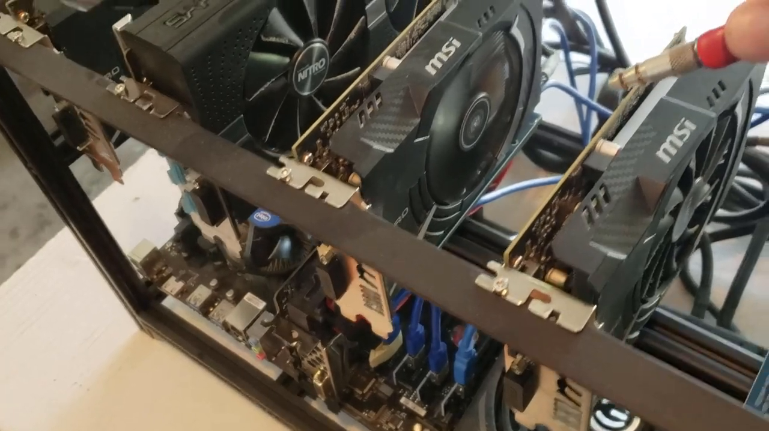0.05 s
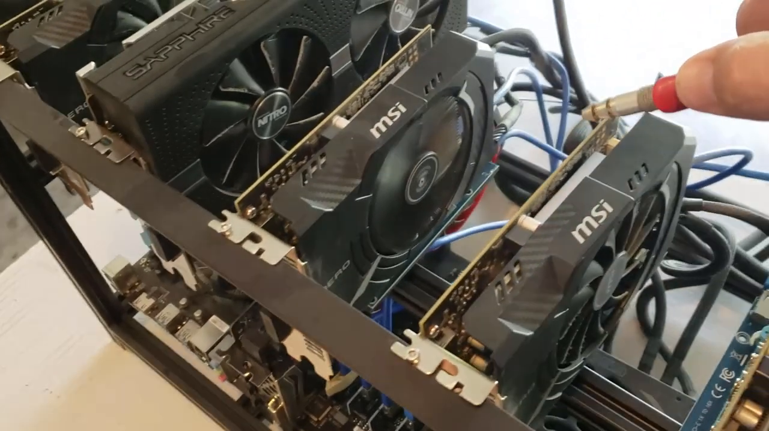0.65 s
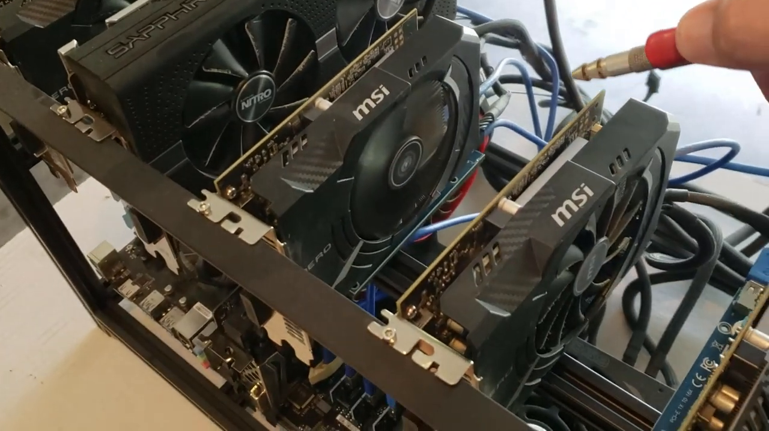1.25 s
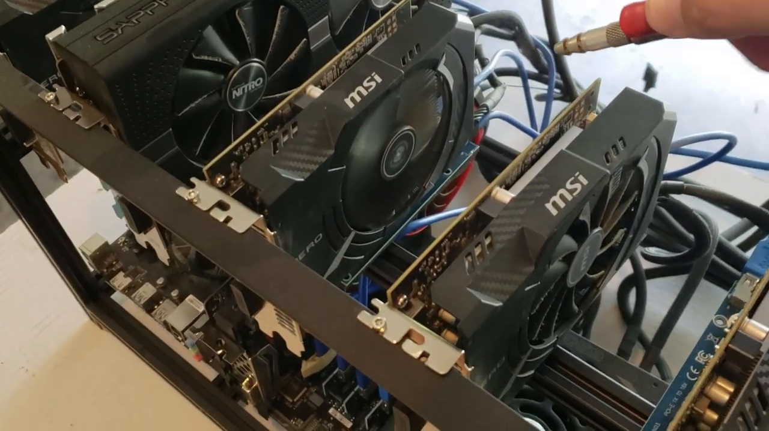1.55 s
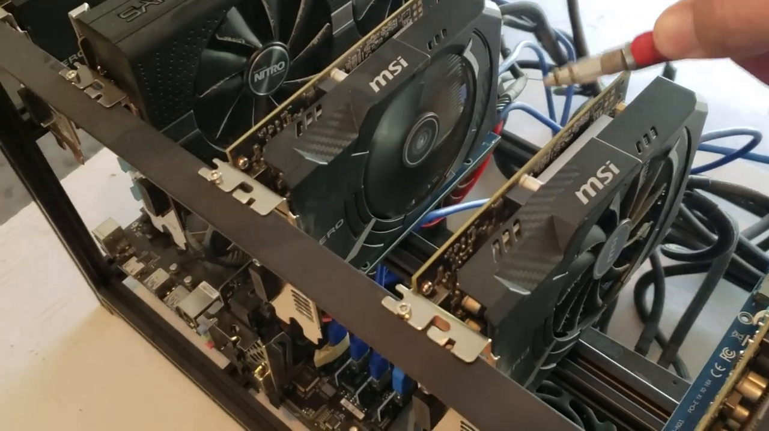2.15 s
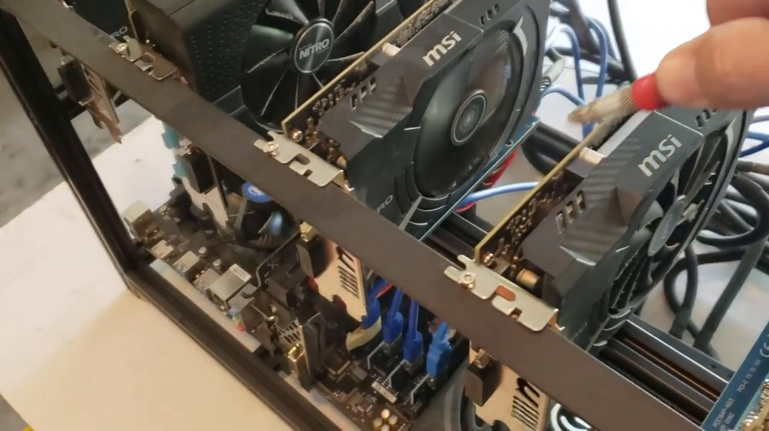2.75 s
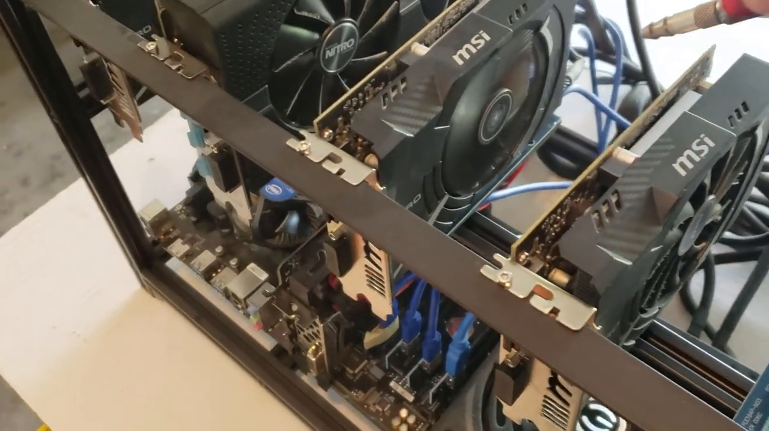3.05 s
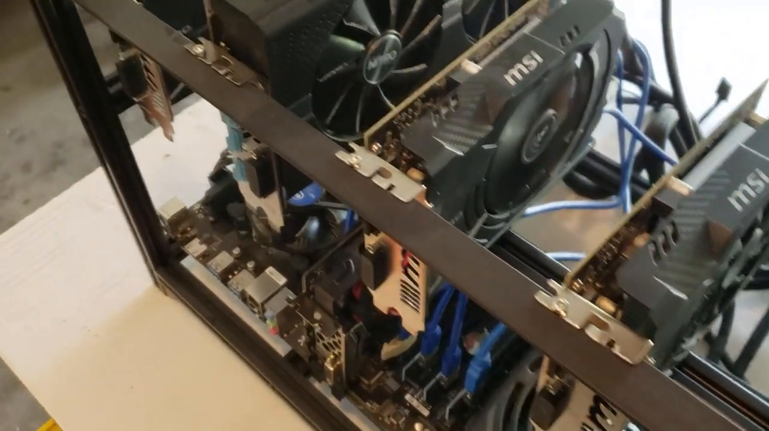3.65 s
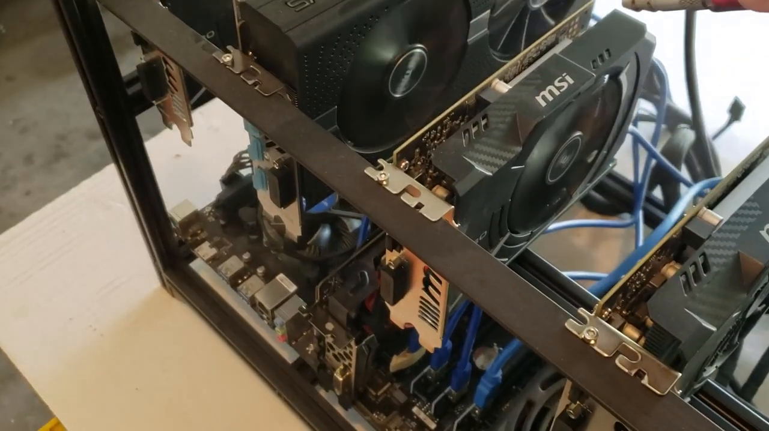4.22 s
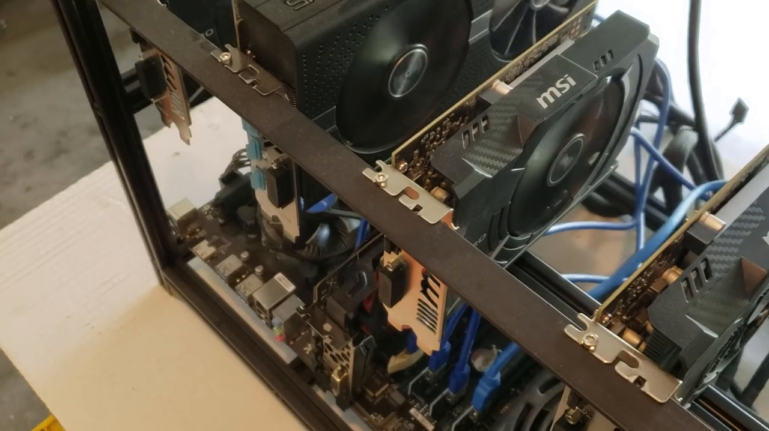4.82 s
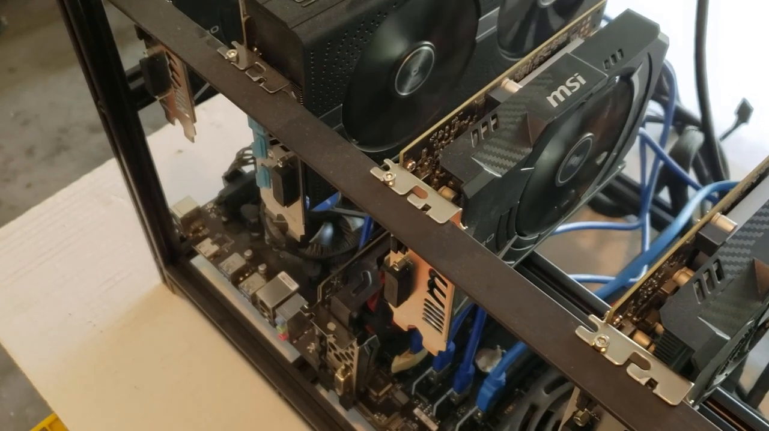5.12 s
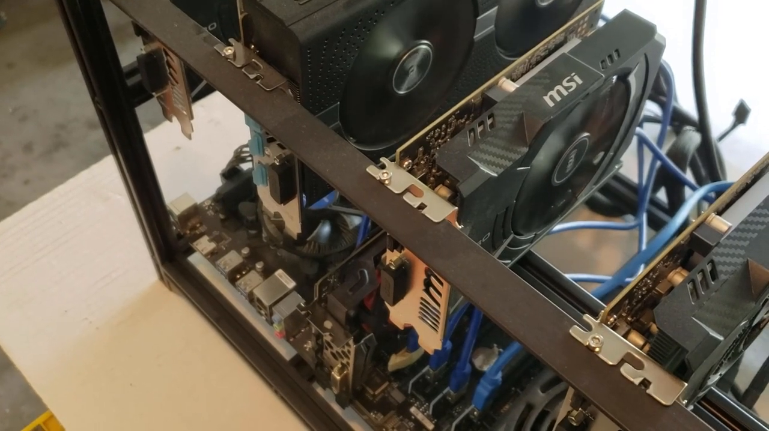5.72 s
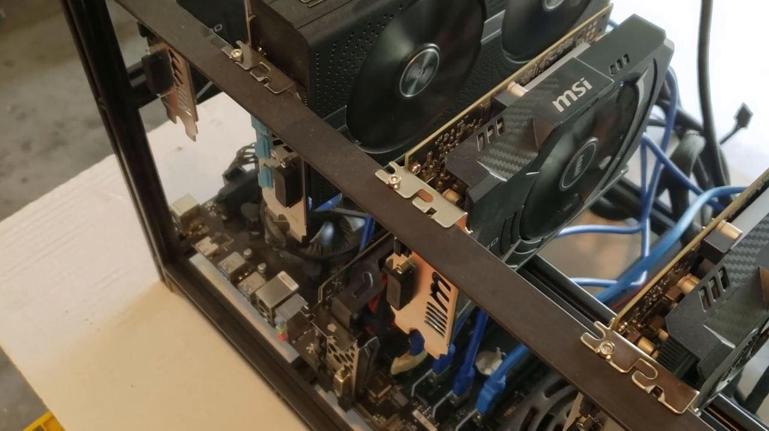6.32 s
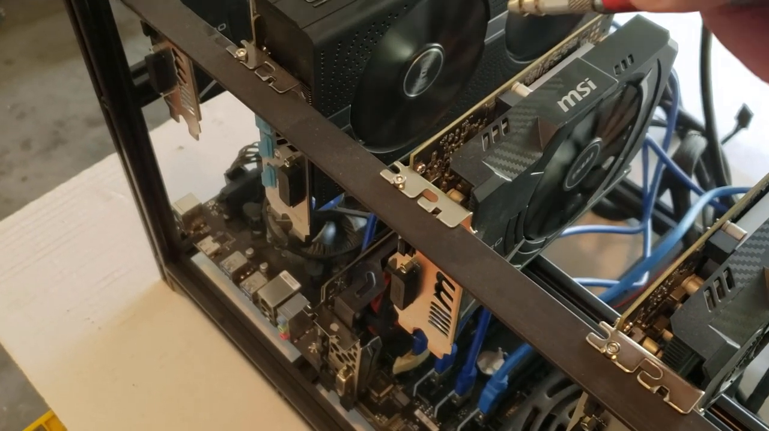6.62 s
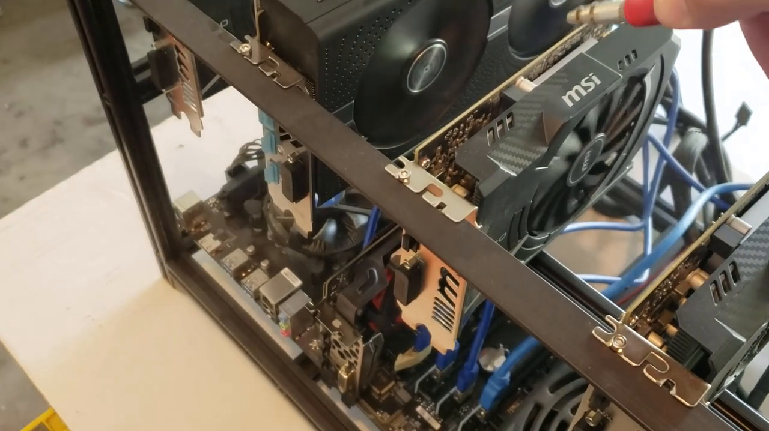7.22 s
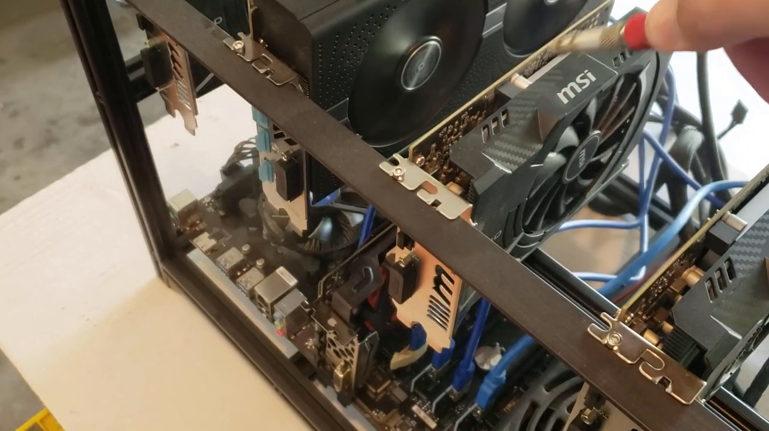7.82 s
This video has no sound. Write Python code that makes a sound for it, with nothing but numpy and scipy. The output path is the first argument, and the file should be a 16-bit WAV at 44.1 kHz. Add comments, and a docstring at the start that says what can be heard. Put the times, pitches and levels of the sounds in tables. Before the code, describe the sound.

Sharp, mostly short blasts of compressed air hiss over computer heatsinks and fans, close by in a small room.

```python
"""A small hard room, a stereo pair of microphones close to an open computer frame.
A blow gun, a little to the left, dusts the frame with eleven bursts of compressed air. The jet hisses,
rushes over heatsink fins and sounds the hollows between the cards, each aim with its own resonances.
Puffs of air buffet the microphones, now and then the jet spins up a fan, and once the gun knocks lightly.
Between the bursts a faint leak hisses over the room's low rumble."""
import sys
import numpy as np
from scipy import signal
from scipy.fft import rfft, irfft, next_fast_len
from scipy.io import wavfile
from scipy.ndimage import map_coordinates

SR = 44100
rng = np.random.default_rng(int(sys.argv[2]) if len(sys.argv) > 2 else 0)


def store_wav(level_fs):
    """Save 16-bit WAV to argv[1]."""
    pcm = np.round(np.clip(np.atleast_2d(level_fs), -1, 1) * 32767)
    wavfile.write(sys.argv[1], SR, pcm.T.astype(np.int16))


N = 347066
TIME = np.arange(N) / SR
SIDES = np.array([[1], [-1]])   # left, right
CUTOFF_HZ = 15750
# the hollow of the frame lifts the air and the fans' hum near one pitch
FRAME_HZ, FRAME_WIDTH_HZ, FRAME_BOOST_DB = 319, 13, 5.5
# trigger pulls: valve opens/s, is shut/s, closing time/s, puff/dB, lean to the left/dB,
# base levels of hollows/dB, fins/dB and free jet/dB, change on the fins as the hand moves/dB
BURSTS = [(.734, 1.026, 0.021, -57, 2, -32.5, -28.5, -25, 1.5),
          (1.645, 1.901, 0.023, -53, 1.5, -30, -23.5, -25.5, -2.5),
          (2.06, 2.323, 0.035, -52, 2, -33, -26.5, -25.5, -8.5),
          (2.521, 2.838, .019, -69, 2.5, -28.5, -28, -26, -1.5),
          (3.006, 3.249, 0.025, -56, 2, -30.5, -22.5, -24.5, -2.5),
          (4.075, 4.64, 0.013, -57, 1.5, -37, -34, -27, 1.5),
          (4.977, 5.998, 0.026, -54, 0, -35.5, -31, -27, 2.5),
          (6.172, 6.445, .022, -48, 1, -30, -29.5, -25.5, -1),
          (6.546, 6.85, 0.032, -57, 2, -31.5, -32, -25.5, -2.5),
          (6.972, 7.277, 0.016, -65, 2, -29.5, -30, -25, 0.5),
          (7.487, 7.957, .02, -57, 1.5, -30.5, -29, -25, -0.5)]


def from_db(db):
    return 10 ** (np.asarray(db) / 20)


def unit_rms(x):
    """Scale so that the mean of the channels has rms 1."""
    return x / np.sqrt(np.mean(np.atleast_2d(x).mean(axis=0) ** 2) + 1e-20)


def at_hz(points, hz):
    """Read (f/Hz, value) points on a log-frequency axis."""
    f, value = np.transpose(points)
    return np.interp(np.log(hz), np.log(f), value)


def pan(db):
    """Left and right gains for a level difference; their mean is 1."""
    gains = from_db(SIDES * db / 2)
    return gains / gains.mean(axis=0)


def bump(t, centre_s, half_s):
    """A smooth swell from 0 to 1 and back."""
    return np.exp(-((t - centre_s) / half_s) ** 2)


def drift(rate_hz, size):
    """A random wander of rms 1 that turns `rate_hz` times a second."""
    steps = np.arange(size) * rate_hz / SR
    count = int(steps[-1]) + 2
    return unit_rms(np.interp(steps, np.arange(count), rng.standard_normal(count)))


def decays(events, rise_s, t60_s):
    """Envelope of short events (t/s, level/dB) that swell and die away."""
    out = np.zeros(N)
    for onset_s, db in events:
        age = TIME[TIME > onset_s][:SR] - onset_s
        start = np.searchsorted(TIME, onset_s, "right")
        out[start:start + len(age)] += from_db(db - 60 * age / t60_s) * (1 - np.exp(-age / rise_s))
    return out


def noise(spectrum, size, balance=((100, 0), (10000, 0)), likeness=None):
    """Coloured stereo noise of rms 1; `balance` lists f/Hz, left minus right/dB."""
    # the two microphones hear much the same bass but unrelated treble: f/Hz, correlation
    pair_likeness = [(60, .4), (130, 1), (310, 0.99), (520, .5), (730, 0.78), (1400, 0.43), (2300, .75),
                     (3400, 0.29), (5000, .15), (7000, 0.0067)]
    length = next_fast_len(size, True)
    hz = np.maximum(np.fft.rfftfreq(length, 1 / SR), 1)
    mid, side = rfft(rng.standard_normal((2, length)))
    alike = np.clip(at_hz(likeness or pair_likeness, hz), -1, 1)
    stereo = np.sqrt(1 + alike) * mid + np.sqrt(1 - alike) * side * SIDES
    colour = from_db(at_hz(spectrum, hz)) * pan(at_hz(balance, hz)) * (hz < CUTOFF_HZ) * (hz > 20)
    return unit_rms(irfft(stereo * colour, length)[:, :size])


def resonate(x, hz, width_hz, boost_db):
    """A resonance lifts the sound around its centre; a negative boost cuts it."""
    b, a = signal.iirpeak(hz, hz / width_hz, fs=SR)
    return x + (from_db(boost_db) - 1) * signal.lfilter(b, a, x)


def leak(level_db=-72, lull_db=-5.5):
    """Leaking air hisses faintly on the left, with one lull."""
    # the hiss: f/Hz, relative density/dB
    spectrum = [(300, -29.5), (630, -18.5), (750, -4.5), (920, -0.5), (1700, -6.5), (2500, -13.5),
                (3300, -8.5), (4000, -16), (5600, -8), (7500, -6.5), (8800, -18), (12000, -7),
                (15000, -17.5)]
    level = from_db(level_db + lull_db * bump(TIME, centre_s=3.85, half_s=.5))
    return level * noise(spectrum, N, balance=[(1000, 4), (6500, 8), (10000, 2)])


def rumble(level_db=-72, waver_db=1.5):
    """Room tone: a low rumble that wavers slightly."""
    # the rumble: f/Hz, relative density/dB
    spectrum = [(20, -26), (40, -13), (62, 7), (85, -5), (118, 1.5), (160, -11.5), (250, -14.5),
                (320, -25.5), (520, -28), (1000, -38.5), (4000, -71.5)]
    return from_db(level_db + waver_db * drift(12, N)) * noise(spectrum, N)


def card_echoes(x, focus, count=6, strength=0.13, treble_lift=0.77, longest_s=.003, sway_s=.00004):
    """Short echoes off the cards; the hand sways, so their comb pattern keeps shifting."""
    size = x.shape[1]
    # small parts reflect short waves best
    treble = signal.sosfilt(signal.butter(1, 7000, "high", fs=SR, output="sos"), x)
    reflected = x + treble_lift * treble
    out = x.copy()
    for channel in range(2):
        for k in range(count):
            lag_s = rng.uniform(0.0996, 1) * longest_s + sway_s * drift(8, size)
            echo = map_coordinates(reflected[channel], [np.arange(size) - lag_s * SR], order=3)
            out[channel] += (-1) ** k * focus * strength * echo
    return out


def registers(x, hollows_below_hz=2600, jet_above_hz=8000):
    """Split the air into the ranges of hollows, fins and free jet, each with rms near 1."""
    size = x.shape[1]
    spectrum, hz = rfft(x), np.fft.rfftfreq(size, 1 / SR)
    hollows = 1 / (1 + (hz / hollows_below_hz) ** 10)
    jet = 1 - 1 / (1 + (hz / jet_above_hz) ** 20)
    fins = np.abs(1 - hollows - jet)
    return [irfft(spectrum * share, size) / np.std(irfft(spectrum.mean(axis=0) * np.sqrt(share)))
            for share in (hollows, fins, jet)]


def aim(t, opens, shut, hollows_db, fins_db, jet_db, change_db, squeeze_s=0.16):
    """Levels/dB of hollows, fins and free jet as the hand glides steadily onto the fins or off them."""
    glide_db = change_db * ((t - opens) / (shut - opens) - .5)
    slip = bump(t, centre_s=2.655, half_s=.075)   # the jet slips off the card once
    squeeze = np.exp(-(t - opens) / squeeze_s)   # the free jet is weaker until the trigger is home
    return (hollows_db + .3 * glide_db - 3.5 * slip,
            fins_db + glide_db - 6.5 * slip,
            jet_db + .35 * glide_db - 2.5 * squeeze)


def blow_gun(focus, opening_s=0.012, eddy_db=0.61, surge_db=-0.13, flutter_db=0.52, tremor_db=0.48):
    """Turbulent air, coloured by the gaps it hits (by `focus`, 0-1), shaken by eddies and hand tremor."""
    # turbulence of the air: f/Hz, relative density/dB
    turbulence = [(30, -27.5), (60, -22), (170, -19.5), (390, -16), (530, -20), (720, -10.5), (1100, -6.5),
                  (2000, -2), (4200, -1.5), (6000, -2.5), (7700, -6.5), (9100, -9.5), (12300, 4),
                  (14200, 0.5), (15600, 0)]
    # the air at the two microphones: f/Hz, left minus right/dB
    balance = [(100, 0), (380, -0.5), (540, 5), (770, 0.5), (1170, 6.5), (1700, 9), (2300, 4.5),
               (3200, 9.5), (4500, 3), (5600, 17), (7700, 24), (9300, -5), (11000, 1), (12400, 1),
               (15000, 1.5)]
    # resonances of the gaps, one list a burst: f/Hz, width/Hz, boost at full focus/dB
    gaps_by_burst = [
        [(820, 170, 2.5), (1720, 90, 5), (2143, 74, 8), (3320, 580, 2.5), (6870, 170, 3), (10600, 370, 6.5)],
        [(720, 73, 2), (2046, 400, 5.5), (2840, 110, 9), (3460, 410, 3), (4420, 160, 5.5), (5940, 700, 5)],
        [(1150, 80, 3.5), (1770, 89, 3.5), (2137, 110, 8.5), (3460, 730, 2), (9900, 430, 6.5)],
        [(740, 160, 3.5), (2080, 78, 8.5), (2170, 76, 9.5), (2660, 73, 6), (2910, 140, 4), (10090, 140, 5.5)],
        [(2050, 210, 9), (2850, 150, 7.5), (3575, 240, 6), (4440, 230, 7), (5630, 700, 8.5), (6730, 400, 5),
         (7950, 170, 5.5)],
        [(570, 160, 2), (986, 150, 2.5), (2090, 510, -2), (5600, 1500, 4)],
        [(630, 250, 3), (1140, 520, 2.5), (7840, 450, 4.5)],
        [(687, 79, 6), (995, 77, 6.5), (1110, 68, 5.5), (1486, 78, 7), (2060, 180, 7), (2530, 110, 3.5)],
        [(610, 81, 8.5), (990, 97, 9.5), (1450, 200, 8), (1900, 200, 2.5)],
        [(1260, 54, 4.5), (1570, 220, 4), (2000, 88, 5), (5440, 190, 5), (7620, 960, 2)],
        [(1580, 620, 4.5), (5420, 220, 1.5), (7200, 850, 3)],
    ]
    # edges that sing as the jet sweeps past: t/s, half duration/s, f/Hz, width/Hz, boost at full focus/dB
    edges = [(0.984, .04, 12500, 298, 5), (4.57, .04, 12500, 400, 4), (5.106, 0.11, 2480, 900, 4.5),
             (5.75, 0.37, 4350, 900, 2.5), (5.926, 0.059, 12450, 200, 11), (6.4, .04, 11850, 300, 7),
             (7.014, 0.027, 2380, 500, 10), (7.217, 0.06, 12550, 400, 3), (7.825, 0.051, 6050, 350, 13.5),
             (7.83, 0.017, 12550, 400, 4)]
    trims_db = (-.4, -.3, -.4)   # hollows, fins, free jet
    out = np.zeros((2, N))
    for (opens, shut, closing_s, _, lean_db, *aimed), gaps in zip(BURSTS, gaps_by_burst):
        during = (TIME >= opens) & (TIME < shut)
        t = TIME[during]
        valve = np.clip((t - opens) / opening_s, 0, 1) ** 1.43 * np.clip((shut - t) / closing_s, 0, 1)
        air = card_echoes(noise(turbulence, len(t), balance), focus)
        air = resonate(air, FRAME_HZ, FRAME_WIDTH_HZ, FRAME_BOOST_DB)
        for hz, width_hz, boost_db in gaps:
            air = resonate(air, hz, width_hz, focus * boost_db)
        for passes, half_s, hz, width_hz, boost_db in edges:
            if opens < passes < shut:
                air = resonate(air, hz, width_hz, focus * boost_db * bump(t, passes, half_s))
        swirl_db = eddy_db * drift(900, len(t)) + surge_db * drift(130, len(t))
        for band, level_db, trim_db in zip(registers(air), aim(t, opens, shut, *aimed), trims_db):
            shake_db = flutter_db * drift(70, len(t)) + tremor_db * drift(14, len(t))
            level = from_db(level_db + trim_db + swirl_db + shake_db)
            out[:, during] += band * valve * pan(lean_db) * level
    return out


def puffs():
    """The first slug of air in each burst pushes a soft low puff ahead of it; stray gusts add to it."""
    # gusts that buffet the microphones: t/s, level/dB
    buffets = [(.742, -48.5), (.805, -47.5), (2.08, -53)]
    # wind pushes on each microphone by itself: f/Hz, left-right correlation
    likeness = [(50, .15), (200, .4)]
    spectrum = [(25, -9), (70, 0), (140, -3), (400, -25), (2000, -70)]   # f/Hz, relative density/dB
    push = decays([(opens, db) for opens, _, _, db, *_ in BURSTS], rise_s=.005, t60_s=0.54)
    gusts = decays(buffets, rise_s=.004, t60_s=0.11)
    return (push + gusts) * noise(spectrum, N, balance=[(40, 7), (300, 3)], likeness=likeness)


def fans(waver_db=2.5, wobble=.028, octave_db=-14, db_per_octave=5, attack_s=.015):
    """Blades chop the jet: the hum rises and grows with the rotor's speed, then sinks as it coasts."""
    # the jet catches a fan: from/s, until/s, first blade rate/Hz, last blade rate/Hz, last level/dB
    pushes = [(0.779, 0.998, 198, 332, -60), (2.057, 2.295, 199.6, 332.5, -62.5),
              (2.519, 2.839, 306, 392, -61.5), (4.4, 4.643, 89.6, 182.3, -63.5),
              (5.4, 5.979, 72.1, 327, -54), (7.17, 7.265, 207, 223, -60), (7.501, 7.879, 180, 330, -56.5)]
    spin_ease = 1.45   # above 1: the speed climbs fast at first, then levels off
    coast_s, coast_hz_per_s, coast_db_per_s = .15, 110, 271.5
    out = np.zeros(N)
    for starts, ends, first_hz, last_hz, last_db in pushes:
        during = (TIME >= starts) & (TIME < ends + coast_s)
        t = TIME[during]
        to_go = np.clip((ends - t) / (ends - starts), 0, 1)
        coasted_s = np.maximum(t - ends, 0)
        blade_hz = last_hz + (first_hz - last_hz) * to_go ** spin_ease - coast_hz_per_s * coasted_s
        phase = 2 * np.pi * np.cumsum(blade_hz * (1 + wobble * drift(60, len(t)))) / SR
        hum_db = last_db + db_per_octave * np.log2(blade_hz / last_hz) - coast_db_per_s * coasted_s
        level = from_db(hum_db + waver_db * drift(40, len(t))) * np.minimum((t - starts) / attack_s, 1)
        out[during] += level * np.sqrt(2) * (np.sin(phase) + from_db(octave_db) * np.sin(2 * phase))
    return resonate(out, FRAME_HZ, FRAME_WIDTH_HZ, FRAME_BOOST_DB)


def knock():
    """The gun knocks once, lightly: a broad noise that dies at once."""
    # the contact: t/s, level/dB
    contacts = [(4.786, -45.5)]
    # its colour: f/Hz, relative density/dB
    spectrum = [(100, -11), (280, -3), (550, 4), (1100, -6), (2200, -2), (4500, -2.5), (7500, -4),
                (10000, -9), (15000, -21)]
    return decays(contacts, rise_s=0.0011, t60_s=0.057) * noise(spectrum, N)


def room(x, wet_db=-11.0, gap_s=0.002, crossfeed=0.3):
    """The hard walls return a diffuse tail that dies band by band, the treble first."""
    # the room's ring: f/Hz, t60/s
    ring_times = [(200, 0.7), (530, .5), (1400, 0.43), (3700, 0.44), (9700, 0.37), (15000, 0.35)]
    tilt = [(3000, 0.0046), (12000, -0.5)]   # f/Hz, level/dB
    age = TIME[:SR * 3 // 4]
    white = rfft(rng.standard_normal((2, len(age))))
    hz = np.fft.rfftfreq(len(age), 1 / SR)
    band_edges = np.geomspace(40, 20000, 13)
    tail = 0
    for low, high in zip(band_edges, band_edges[1:]):
        centre = np.sqrt(low * high)
        band = irfft(white * (hz >= low) * (hz < high), len(age))
        fade = from_db(-60 * age / at_hz(ring_times, centre)) * (age > gap_s)
        tail = tail + from_db(wet_db + at_hz(tilt, centre)) * band * fade / np.linalg.norm(fade)
    blended = (x + crossfeed * x[::-1]) / np.hypot(1, crossfeed)
    return signal.fftconvolve(blended, tail, axes=1)[:, :N]


def scene():
    """Air, fans and knock reach the microphones directly and off the walls, over leak and room tone."""
    small_sounds = knock() + puffs() + fans()
    direct = blow_gun(focus=1.0) + small_sounds
    # the air sent to the walls leaves in all directions, so its resonances partly average out
    to_walls = blow_gun(focus=0.6) + from_db(-3) * small_sounds
    return direct + room(to_walls) + leak() + rumble()


def record(dry):
    """A steep low-pass cuts the top of both channels."""
    return signal.sosfilt(signal.ellip(12, .1, 80, CUTOFF_HZ, fs=SR, output="sos"), dry)


dry = scene()
out = record(dry)
store_wav(out)
```